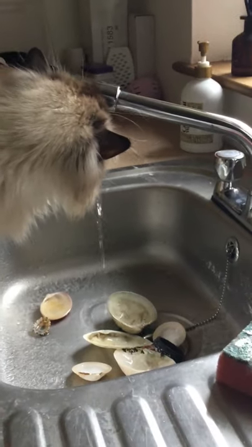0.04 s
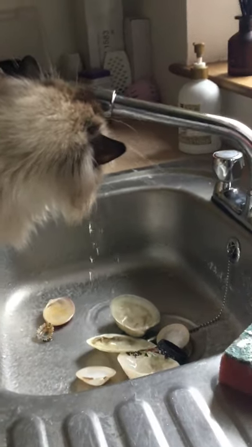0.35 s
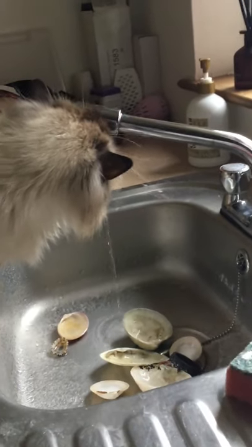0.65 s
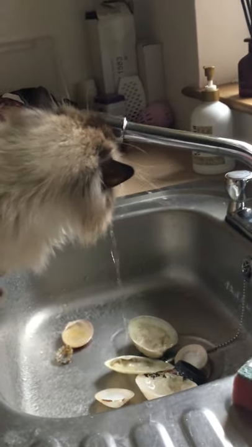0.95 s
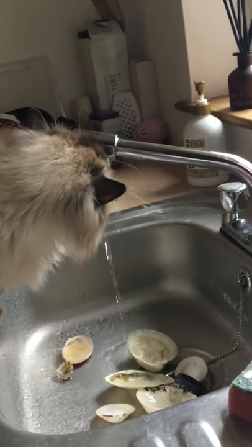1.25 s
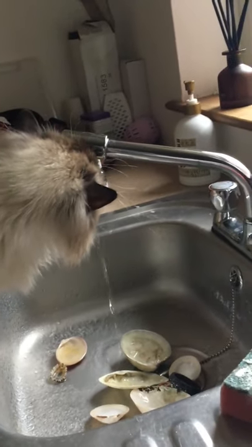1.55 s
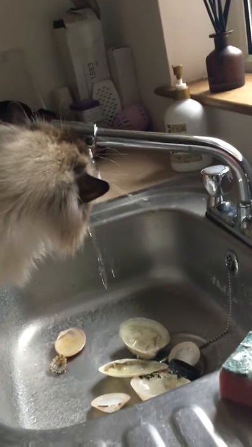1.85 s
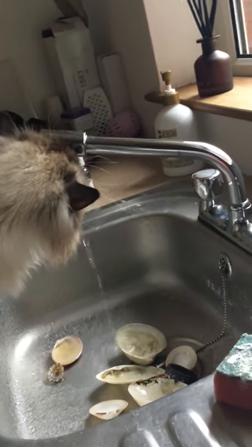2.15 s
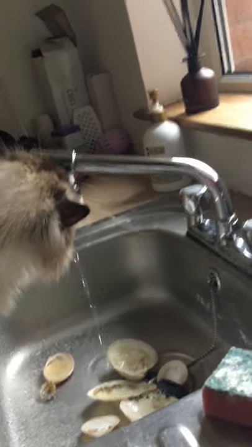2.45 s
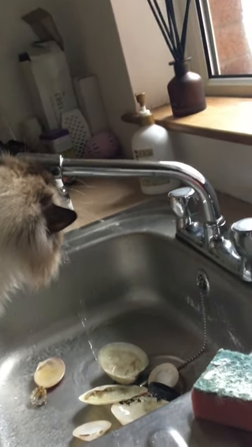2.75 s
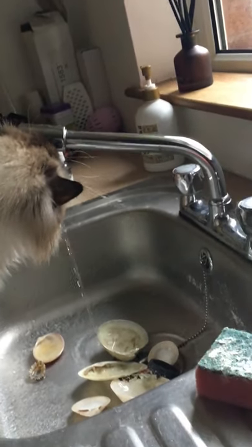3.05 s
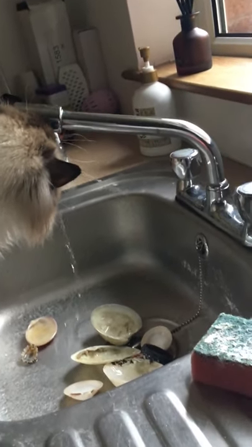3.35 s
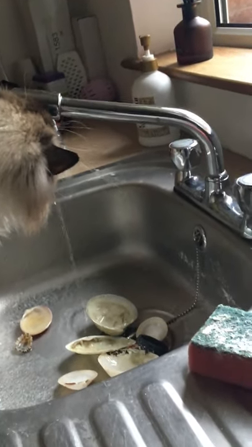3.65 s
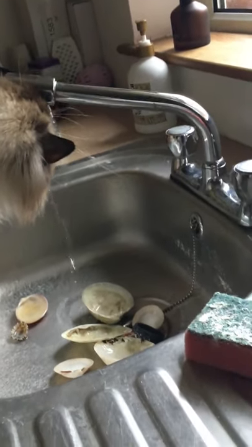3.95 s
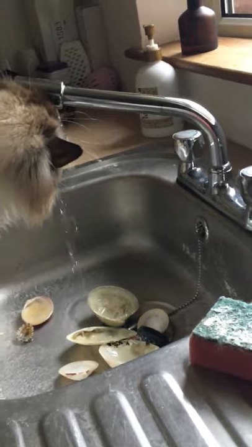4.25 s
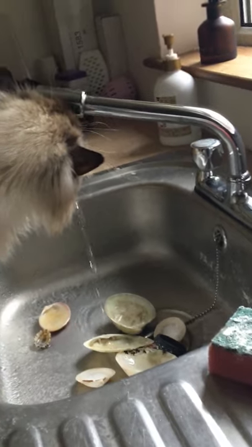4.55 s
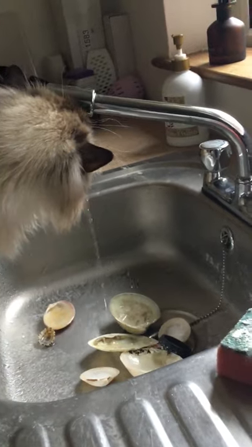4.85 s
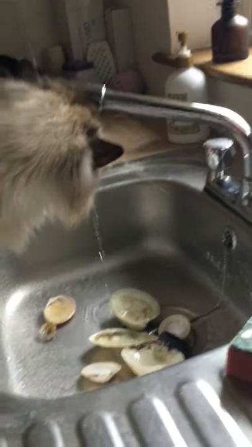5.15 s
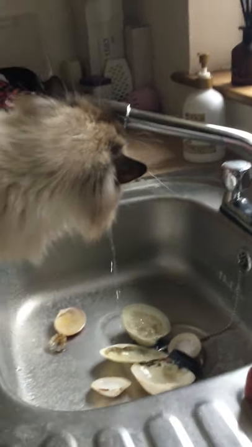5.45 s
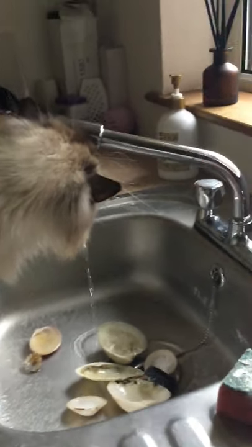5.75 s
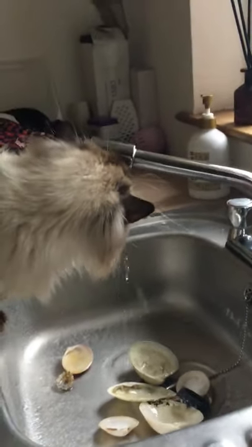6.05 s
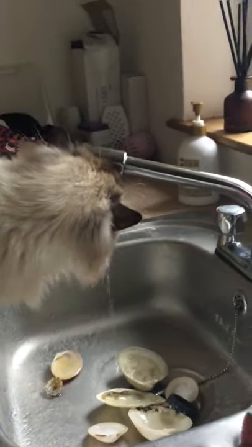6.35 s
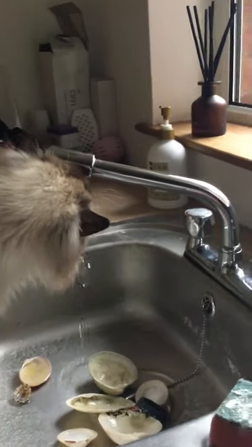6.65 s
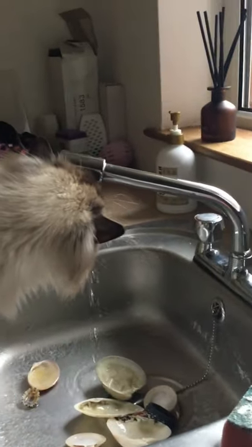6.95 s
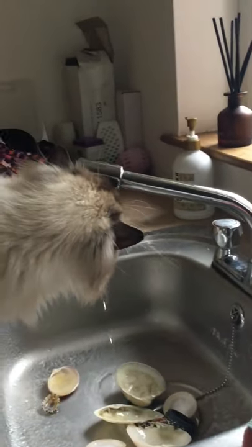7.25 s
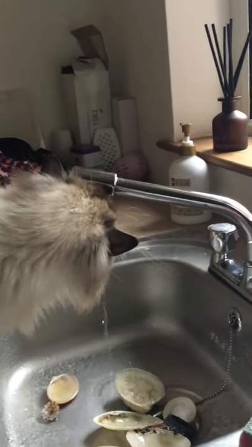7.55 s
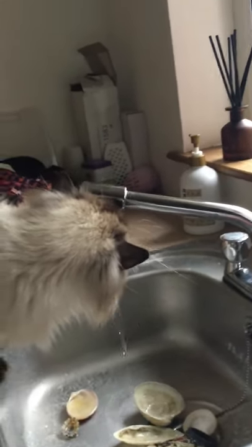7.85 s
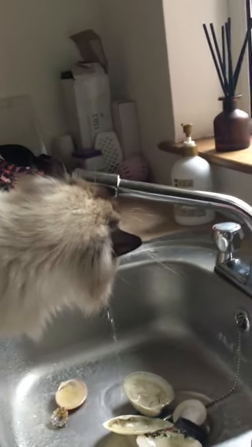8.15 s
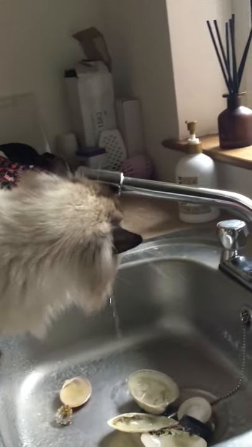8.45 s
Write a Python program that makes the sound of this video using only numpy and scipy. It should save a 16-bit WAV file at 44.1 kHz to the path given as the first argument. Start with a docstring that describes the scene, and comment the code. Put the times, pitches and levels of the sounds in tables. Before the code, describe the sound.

Close up in a quiet kitchen, a trickle of water breaks into small and heavier drops that tap and spatter on a steel sink. Over the steady dripping, a cat licks at the stream three or four times a second, with wet tongue clicks and little chirping pops that stand out more around the middle. A faint low hum sits underneath.

```python
"""A cat laps at a thin trickle from a kitchen tap, nearly four licks a second.
Water films snap off its tongue in wet clicks, and air pockets pop as tiny chirps and soft glugs.
The licks break the stream into drops that slap the steel sink, set it ringing and throw up spray.
Underneath, two motors hum and beat slowly against each other in the quiet room."""
import sys
import numpy as np
from scipy import signal
from scipy.fft import rfft, irfft
from scipy.io import wavfile

SR = 44100
rng = np.random.default_rng(int(sys.argv[2]) if len(sys.argv) > 2 else 0)


def generate_wav(sig):
    """Save sig (samples, or channels by samples) to the path in sys.argv[1] as 16-bit PCM at SR."""
    pcm = np.round(np.clip(np.atleast_2d(sig).T, -1, 1) * 32767).astype(np.int16)
    wavfile.write(sys.argv[1], SR, pcm)


N = 379260
TIME = np.arange(N) / SR
AGE = np.arange(SR // 4) / SR   # seconds since a contact
CUTOFF_HZ = 16200


def from_db(db):
    """Decibels to gain."""
    return 10 ** (np.asarray(db) / 20)


def rms_one(x):
    """Scale to rms 1."""
    return x / np.sqrt(np.mean(x ** 2) + 1e-20)


def peak_one(x):
    """Scale to peak 1."""
    return x / (np.abs(x).max() + 1e-20)


def decay(t60):
    """Envelope that falls 60 dB in t60 seconds."""
    return np.exp(-np.log(1000) * AGE / t60)


def band(x, low_hz, high_hz, order=2):
    """Causal band-pass."""
    sos = signal.butter(order, [low_hz, min(high_hz, SR / 2 - 500)], "band", fs=SR, output="sos")
    return signal.sosfilt(sos, x + 1e-18)


def resonance(x, hz, width_hz):
    """One two-pole resonance."""
    r = np.exp(-np.pi * width_hz / SR)
    return signal.lfilter([1, 0, -1], [1, -2 * r * np.cos(2 * np.pi * hz / SR), r * r], x + 1e-18)


def noise(spectrum):
    """Steady noise of a given colour, rms 1."""
    hz, db = np.transpose(spectrum)
    gain = from_db(np.interp(np.log(np.fft.rfftfreq(N, 1 / SR) + 1), np.log(hz), db))
    return rms_one(irfft(rfft(rng.standard_normal(N)) * gain, N))


def add(out, s, sound):
    """Mix a sound in at s seconds."""
    i = int(np.clip(s * SR, 0, N - 1))
    out[i:i + len(sound)] += sound[:N - i]


# The dark bed of room tone. Each row: frequency in Hz, relative noise density in dB.
ROOM_TONE = [(25, -44), (35, -38), (52, -2), (75, -5), (150, -0.5), (255, -1.5), (370, -5.5), (440, -14),
             (600, -11.5), (1100, -23), (2000, -32), (3000, -31.5), (7000, -39), (16000, -44.5)]


def room_tone(rms_db=-57):
    """The quiet kitchen is a faint, steady, low rush."""
    return from_db(rms_db) * noise(ROOM_TONE)


# Partials of the hum. Each row: frequency in Hz, level before trim in dB, time of a crest in seconds.
HUM_PARTIALS = [(97.56, -55, .353), (99.94, -55, .353), (195.12, -57.5, .078), (199.88, -55.5, .078),
                (237.27, -57, 0), (299.88, -62, 0)]
# The hum dips briefly. Each row: time in seconds, gain in dB.
HUM_DIP = [(4.2, 6.5), (4.4, 1.5), (4.7, -0.5), (4.9, 5)]


def motors(trim_db=-7.5):
    """A mains hum and a slightly slower motor drift in and out of step."""
    hum = sum(from_db(db) * rms_one(np.cos(2 * np.pi * hz * (TIME - s))) for hz, db, s in HUM_PARTIALS)
    return from_db(trim_db + np.interp(TIME, *np.transpose(HUM_DIP))) * hum


def spray(level_db=-63, per_s=70, low_hz=3000, high_hz=14000):
    """Specks of spray tick at random on the wet steel."""
    when, chance = rng.random((int(per_s * TIME[-1]), 2)).T
    ticks = np.zeros(N)
    ticks[(when * N).astype(int)] = from_db(level_db + np.log(chance + .03))
    return band(ticks, low_hz, high_hz)


def bending_wave(sweep_s, t60, swell_s, top_hz=2700):
    """High notes travel faster through sheet steel, so a blow arrives as a quickly falling chirp."""
    age = AGE[:SR // 30]
    pitch = top_hz / (1 + age / sweep_s) ** 2
    envelope = decay(t60)[:len(age)] * (1 - np.exp(-age / swell_s))
    return peak_one(np.sin(2 * np.pi * np.cumsum(pitch) / SR) * envelope)


# The ring of the steel basin. Each row: mode frequency in Hz, relative level in dB.
BASIN_MODES = [(120, -1), (149, 12.5), (229, 6.5), (253, 13.5), (314, 3.5), (350, 7.5), (385, 3), (474, 5),
               (517, 12), (549, 9), (606, 9), (673, 6.5), (746, 0), (810, -2), (864, 0.5), (910, -3.5),
               (947, 4), (982, -1), (1206, 5.5), (1287, -22), (1340, -14), (1392, 3.5), (1497, -27),
               (1661, -24), (1908, -22), (1981, -10.5), (2083, -27)]


def basin(times, gains, slap_db, wash_db, ring_db, boom_db,
          ring_t60=0.19, boom_t60=0.37, wash_t60=0.16, sweep_s=0.001966, share_db=2):
    """Each drop slaps the steel; the wave scatters off the walls as a wash and leaves the modes ringing."""
    hz, db = np.transpose(BASIN_MODES)
    booms = hz < 400   # the whole floor flexes in the low modes
    t60 = np.where(booms, boom_t60, ring_t60)
    mode_gains = from_db(db + np.where(booms, boom_db, ring_db))
    modes = np.sin(2 * np.pi * hz[:, None] * AGE) * decay(t60[:, None]) * mode_gains[:, None]
    share, polarity, landing = rng.standard_normal((len(times), 3, len(hz))).swapaxes(0, 1)
    rings = (from_db(share_db * share) * np.sign(polarity)) @ modes   # a new blend for every drop
    sweeps = sweep_s * np.exp(0.18 * landing[:, 0])   # the landing point wanders
    bursts = rng.standard_normal((len(times), SR // 12)) * decay(wash_t60)[:SR // 12]
    washes = band(bursts, low_hz=280, high_hz=1890)
    out = np.zeros(N)
    for s, gain, ring, sweep, wash in zip(times, gains, rings, sweeps, washes):
        add(out, s, gain * from_db(slap_db) * bending_wave(sweep, t60=.013, swell_s=.0006))
        add(out, s, gain * from_db(wash_db) * peak_one(wash))
        add(out, s, gain * ring)
    return out


# The sizzle of a splash. Each row: frequency in Hz, relative noise density in dB.
SPATTER_COLOUR = [(1800, -38), (2600, -15), (3500, 2), (5200, 1), (6800, -3), (8200, 0.5), (11000, -7.5),
                  (16000, -10)]


def spatter(times, gains, t60=0.021, tail_db=-17, tail_t60=0.32):
    """Each impact throws a short bright spray with a soft tail."""
    burst = decay(t60) + from_db(tail_db) * decay(tail_t60)
    envelope = np.zeros(N)
    for s, gain in zip(times, gains):
        add(envelope, s, gain * burst)
    return envelope * noise(SPATTER_COLOUR)


# The lapping tempo, slower in the middle; the tongue cuts the stream at each whole count.
# Each row: time in seconds, licks so far.
LAPPING = [(0, .1), (1.9, 8), (3.44, 14), (4.9, 19), (6.19, 23), (8.6, 32.8)]
# Water that gets past the cat. Each row: time in seconds, gain in dB.
FLOW = [(0, -0.5), (1.5, -0.5), (2.7, -2), (3.85, 0), (4.15, -3), (5.1, -1), (6.6, -1.5), (8.2, -3),
        (8.6, 6.5)]
# In one lick the tongue catches the stream, sheds what it gathered and closes in again.
# Each row: fraction of the lick, gain in dB.
LICK_SHAPE = [(0, -7), (.14, -3.5), (.32, 0.5), (.6, -1.5), (.85, -3), (1, -14)]


def patter(level_db=-51.5, drips_per_s=35.3, jitter=.14, size_db=3.5, merge_s=.022,
           spatter_db=-17.5, wet_spread_db=6.5):
    """The trickle breaks into small drops at a loose rhythm, ducking as each lick catches it."""
    count = int(drips_per_s * TIME[-1])
    late, size, wet = np.clip(rng.standard_normal((count, 3)).T, -2, 1.3)
    times = (np.arange(count) + jitter * late) / drips_per_s
    lick_phase = np.interp(times, *np.transpose(LAPPING)) % 1
    flow_db = np.interp(times, *np.transpose(FLOW)) + np.interp(lick_phase, *np.transpose(LICK_SHAPE))
    to_big_drop_s = np.abs(times[:, None] - np.array(BIG_DROPS)[:, 0]).min(axis=1)
    alone = to_big_drop_s > merge_s   # a big drop swallows its neighbours
    gains = alone * from_db(level_db + flow_db + size_db * size)
    steel = basin(times, gains, slap_db=0, wash_db=-9, ring_db=-23, boom_db=-18)
    return steel + spatter(times, gains * from_db(spatter_db + wet_spread_db * wet))


# Heavy hits on the sink floor. Each row: start in seconds, strike level in dB, spatter send in dB.
BIG_DROPS = [(0.038, -43.5, -14.5), (0.149, -41.5, -3), (0.174, -42.5, -21), (0.276, -45.5, -10),
             (0.297, -46.5, -22), (0.32, -44.5, -22), (0.407, -50, -20.5), (0.581, -47, -6),
             (0.607, -49.5, -10), (0.634, -45.5, -18), (0.806, -44.5, -15), (0.891, -42.5, -20.5),
             (1.092, -41.5, -10), (1.272, -47, -18), (1.364, -40.5, -15), (1.517, -46.5, -12),
             (1.597, -42, -24), (1.733, -43, -10.5), (1.796, -45.5, -7.5), (2.031, -46.5, -7),
             (2.057, -45, -27), (2.283, -42, -4), (2.571, -44.5, -6), (2.742, -47, -11),
             (2.846, -46.5, -12), (3.03, -46.5, -19), (3.166, -43, -9), (3.317, -41.5, -12.5),
             (3.529, -42.5, -20), (3.578, -44, -9.5), (3.625, -43.5, -10), (3.876, -40.5, -29),
             (3.933, -45, -22), (4.588, -45, -8.5), (4.679, -45.5, -29), (4.734, -40.5, -13.5),
             (5.041, -44, -6.5), (5.162, -44, -14), (5.194, -45, -6.5), (5.299, -43.5, -18),
             (5.512, -50, -1), (5.62, -43, -0.5), (5.774, -45.5, -10), (5.874, -46, -18), (5.985, -48, -8),
             (6.056, -46.5, -8.5), (6.263, -49, -9), (6.511, -48, -5), (6.538, -45, -11),
             (6.721, -45.5, -22), (6.787, -45, -6.5), (6.923, -44.5, -6.5), (7.2, -46.5, -8),
             (7.307, -45, -10.5), (7.587, -48.5, -9), (7.76, -47, -17), (7.865, -46, -13),
             (8.482, -41.5, -16), (8.523, -45, -5.5), (8.545, -42.5, -9)]


def big_drops(spatter_trim_db=-5):
    """Water that gathers on the chin falls in heavy drops."""
    times, db, send_db = np.transpose(BIG_DROPS)
    steel = basin(times, from_db(db), slap_db=-1.5, wash_db=-7.5, ring_db=-26, boom_db=-23.5)
    return steel + spatter(times, from_db(db + send_db + spatter_trim_db))


# The basin's tone as bell filters. Each row: centre in Hz, width in Hz, boost or cut in dB.
BASIN_EQ = [(420, 33, -8.5), (1105, 86, -15), (1432.6, 44, 6), (1820, 95, -9.5), (1964, 240, 7),
            (7480, 800, -10.5), (7970, 310, 8), (13900, 1000, 6)]


def basin_colour(x):
    """The drops take on the humps and hollows of the basin's response."""
    for hz, width_hz, db in BASIN_EQ:
        width, lift = np.tan(np.pi * width_hz / SR), from_db(db / 2)
        tuning = -2 * np.cos(2 * np.pi * hz / SR)
        forward = [1 + width * lift, tuning, 1 - width * lift]
        feedback = [1 + width / lift, tuning, 1 - width / lift]
        x = signal.lfilter(forward, feedback, x + 1e-18)
    return x


def each_lick(level_db, spread_db, low_hz, high_hz, scatter_s):
    """One random cue near every cut of the stream. Each row: start in seconds, level in dB, pitch in Hz."""
    times, licks = np.transpose(LAPPING)
    cuts = np.interp(np.arange(1, licks[-1]), licks, times)
    late, size, pitch = rng.uniform(-1.1, 1, (len(cuts), 3)).T
    hz = low_hz * (high_hz / low_hz) ** ((pitch + 1) / 2)
    return list(zip(cuts + scatter_s * late, level_db + spread_db * size, hz))


# Wet tongue clicks that stand out. Each row: start in seconds, level before trim in dB, pitch in Hz.
TONGUE_CLICKS = [(0.472, -47, 11800), (1.2528, -41, 10000), (1.671, -48, 15100), (1.7953, -43, 15600),
                 (1.9295, -48, 11700), (2.4765, -49, 9100), (2.9505, -50, 7260), (3.6386, -35.5, 12200),
                 (3.852, -34, 8200), (4.0917, -42.5, 7900), (4.814, -41, 13600), (4.956, -43, 9900),
                 (5.041, -43, 12600), (5.482, -46, 7650), (5.621, -34, 10700), (6.5102, -41, 8500),
                 (6.867, -41, 11000), (7.1278, -47, 13100), (7.9777, -47.5, 13200), (8.5225, -47, 8600)]


def tongue(trim_db=-1, width_hz=2300, snap_t60=.011, crackle_db=-15, crackle_t60=0.013, splash_db=-13):
    """A film of water snaps off the tongue, rings a tiny cavity and crackles away in a broad splash."""
    faint = each_lick(level_db=-56.5, spread_db=2, low_hz=6800, high_hz=14000, scatter_s=.08)
    out = np.zeros(N)
    for s, db, hz in TONGUE_CLICKS + faint:
        snap, grain = rng.standard_normal((2, len(AGE)))
        crackle = from_db(crackle_db) * grain * np.abs(grain) * decay(crackle_t60)
        attack = 1 + 1.2 * decay(t60=.004)   # the film tears hardest in its first instant
        tear = (snap * decay(snap_t60) + crackle) * attack
        cavity = peak_one(resonance(tear, hz, width_hz))
        splash = from_db(splash_db) * peak_one(band(tear, 2100, CUTOFF_HZ))
        add(out, s, from_db(db + trim_db) * (cavity + splash))
    return out


def air_pockets(cues, q, rub_t60, pop):
    """A pocket of air pops and rings at its own pitch while the wet tongue keeps rubbing it."""
    out = np.zeros(N)
    for s, db, hz in cues:
        drive = rng.standard_normal(len(AGE)) * decay(rub_t60)
        drive[0] += pop * np.sqrt(SR / hz)
        ring = band(resonance(drive, hz, hz / q), hz / 2, hz * 2, order=1)
        add(out, s, from_db(db) * peak_one(ring))
    return out


# The clearest pops at the mouth. Each row: start in seconds, level before trim in dB, pitch in Hz.
BUBBLES = [(0.973, -56.5, 2800), (1.1084, -59, 2230), (1.176, -59, 4730), (1.978, -57.5, 4900),
           (2.204, -55, 2720), (2.775, -60, 4700), (3.455, -57, 3450), (4.361, -59, 5160),
           (4.0914, -39.5, 4500), (4.109, -54.5, 2620), (5.482, -53, 3340), (6.0415, -45, 2630),
           (6.1699, -53.5, 4850), (6.6664, -50, 2500), (6.847, -54.5, 4540), (7.3746, -52.5, 4650)]


def bubbles(trim_db=1):
    """Tiny bubbles pop in short, bright chirps: a faint one every lick and some clear accents."""
    faint = each_lick(level_db=-66, spread_db=3, low_hz=4000, high_hz=7000, scatter_s=.06)
    return from_db(trim_db) * air_pockets(BUBBLES + faint, q=12, rub_t60=0.011, pop=1.85)


# Soft, low glugs. Each row: start in seconds, level before trim in dB, pitch in Hz.
GLUGS = [(.26, -48, 384), (2.195, -50, 384), (3.455, -48.5, 356), (4.412, -49, 524)]


def glugs(trim_db=-3):
    """Low-pitched air pockets, rubbed for longer, give a round glug."""
    return from_db(trim_db) * air_pockets(GLUGS, q=5.4, rub_t60=0.17, pop=0.58)


def fat_drop(start_s=5.6517, peak_db=-33):
    """One fat drop lands on bare steel with a tight, low plop."""
    out = np.zeros(N)
    add(out, start_s, from_db(peak_db) * bending_wave(sweep_s=.0018, t60=0.019, swell_s=0.0082))
    return out


def kitchen(x, early_db, tail_db, tail_t60=0.19, early_t60=0.091, echoes_per_s=700):
    """Add sparse echoes from the basin walls and tiles, then the short tail of the room."""
    arrived = AGE > .002   # pre-delay
    taps = rng.standard_normal(len(AGE)) * (rng.random(len(AGE)) < echoes_per_s / SR)
    early = taps * decay(early_t60) * arrived
    tail = band(rng.standard_normal(len(AGE)), 150, 6500, order=1) * decay(tail_t60) * arrived
    early *= from_db(early_db) / np.linalg.norm(early)
    tail *= from_db(tail_db) / np.linalg.norm(tail)
    return x + signal.fftconvolve(x, early + tail)[:N]


def scene():
    """Sink, mouth and room at one close microphone."""
    sink = kitchen(basin_colour(big_drops() + patter()), early_db=-18, tail_db=-13)
    # the head hides the mouth, so much of it arrives by echo
    mouth = kitchen(bubbles() + glugs(), early_db=-6.5, tail_db=-1)
    bed = motors() + room_tone()
    clicks = kitchen(tongue() + spray(), early_db=-6.5, tail_db=-2.5)
    return (sink + fat_drop() + clicks + mouth + bed)[None]


def record(dry):
    """The microphone sheds deep bass; the top is cut steeply."""
    low_cut = signal.butter(2, 35, "high", fs=SR, output="sos")
    high_cut = signal.ellip(10, .1, 70, CUTOFF_HZ, fs=SR, output="sos")
    return signal.sosfilt(high_cut, signal.sosfilt(low_cut, dry))


dry = scene()
out = record(dry)
generate_wav(out)
```